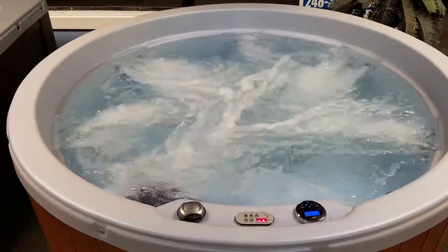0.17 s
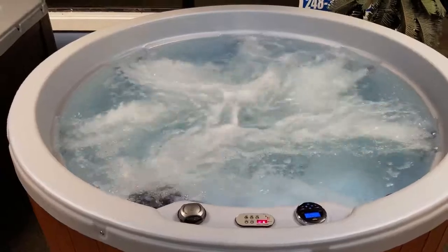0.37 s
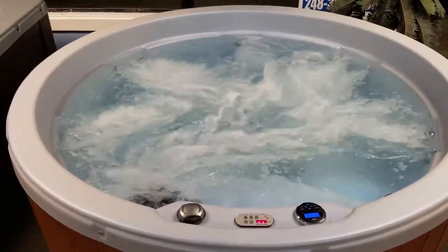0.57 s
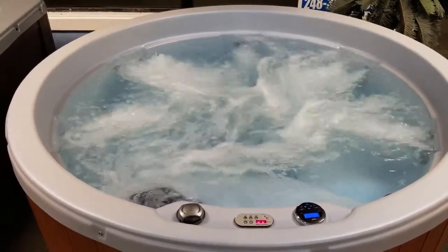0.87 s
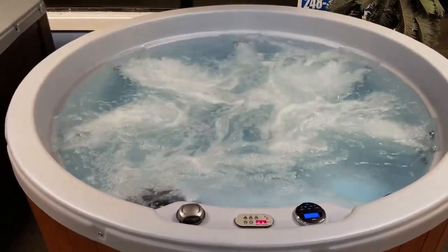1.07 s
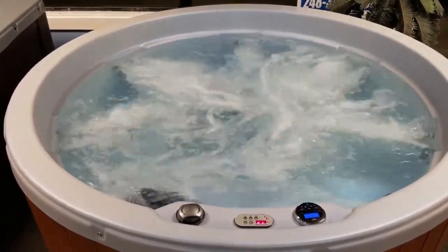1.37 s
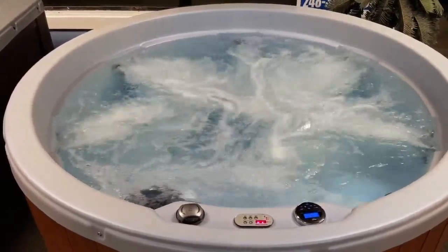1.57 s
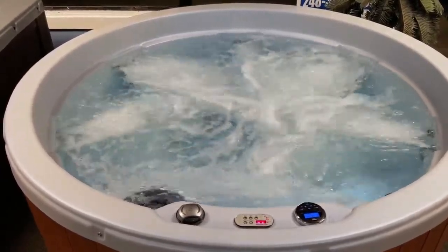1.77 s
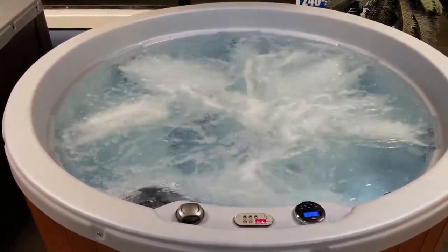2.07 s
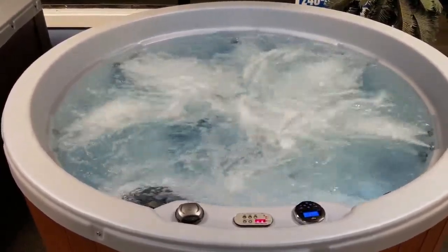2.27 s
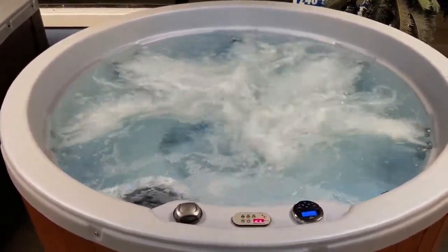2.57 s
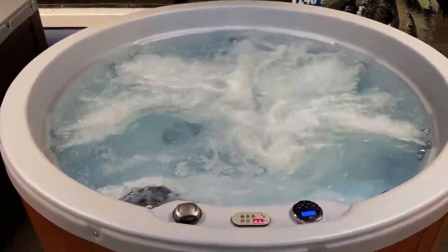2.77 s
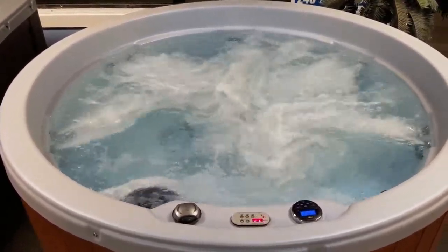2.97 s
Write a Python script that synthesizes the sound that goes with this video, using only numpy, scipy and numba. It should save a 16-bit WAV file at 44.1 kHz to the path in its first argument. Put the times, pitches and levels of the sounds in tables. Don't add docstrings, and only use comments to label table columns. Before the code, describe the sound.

A hot tub churns close to a small stereo camera microphone. After about 0.1 s of near silence it fades in quickly, then runs steadily to the end. Low, resonant jet roar dominates, with dense gurgling and deep glugs every few tenths of a second. Foam and air valves hiss brightly over a steady low pump hum. Light plops scatter throughout, clustering around 2.45-2.65 s; more glugs bunch near 3 s.

```python
import sys
import numpy as np
from scipy import signal
from scipy.fft import rfft, irfft
from scipy.io import wavfile
from scipy.ndimage import uniform_filter1d
from numba import njit

SR = 44100
rng = np.random.default_rng(int(sys.argv[2]) if len(sys.argv) > 2 else 0)


def inscribe(sig):
    pcm = np.round(np.clip(np.atleast_2d(sig).T, -1, 1) * 32767)
    wavfile.write(sys.argv[1], SR, pcm.astype(np.int16))


def field_ratio(decibels):
    return 10 ** (np.asarray(decibels, dtype=float) / 20)


N = 138033
HZ = np.arange(N // 2 + 1) * SR / N
PLOP_GLIDE = 0.2


def at_level(x, db):
    return x * field_ratio(db) / np.sqrt(np.mean(x ** 2))


def noise(channels):
    return rfft(rng.standard_normal((channels, N)))


def colour(curve):
    hz, db = np.array(curve, float).T
    log_hz = np.log(np.maximum(HZ, 1))
    below = np.maximum(np.log(hz[0]) - log_hz, 0)
    above = np.maximum(log_hz - np.log(hz[-1]), 0)
    return field_ratio(np.interp(log_hz, np.log(hz), db) - 146 * (below + above))


def bumps(bells):
    return field_ratio(sum(db * np.exp(-((HZ - hz) / width) ** 2) for hz, width, db in bells))


def surge(curve):
    return field_ratio(np.interp(np.arange(N) / SR, *np.array(curve).T))


def walk(rate):
    hold = int(SR / rate)
    steps = np.repeat(rng.standard_normal(200), hold)[:N + hold]
    return 1.5 * uniform_filter1d(uniform_filter1d(steps, hold), hold)[:N]


def lively(spectra, swell_db, flicker_db, rate):
    out, shared = 0, walk(1.5)
    octaves = np.log2(np.maximum(HZ, 1))
    for centre_hz in 40 * 2 ** np.arange(0, 9.1, .5):
        band = np.cos(np.pi * np.clip(octaves - np.log2(centre_hz), -.5, .5)) ** 2
        shared = .7 * shared + .7 * walk(3)
        out = out + irfft(spectra * band, N) * field_ratio(swell_db * shared + flicker_db * walk(rate))
    return out


@njit
def ring(bubble_rows, glide):
    out = np.zeros((2, N))
    for s, hz, cycles, left, right in bubble_rows:
        n = int(cycles * SR / hz)
        w = 2 * np.pi * hz / SR
        fall = np.exp(-3. / n)
        step = fall * np.exp(1j * w)
        bend = np.exp(1j * w * glide / n)
        z, shut = 1.8 + 0j, 1.
        start = int(s * SR)
        for i in range(start, min(start + 2 * n, N)):
            shut *= fall * fall
            out[0, i] += left * (1 - shut) * z.imag
            out[1, i] += right * (1 - shut) * z.imag
            z *= step
            step *= bend
    return out


def rows(s, hz, cycles, db, pan_db):
    return np.column_stack([s, hz, cycles + 0 * s, field_ratio(db + pan_db / 2), field_ratio(db - pan_db / 2)])


def rumble():
    return at_level(irfft(noise(channels=1)[0] / (1 + (HZ / 42) ** 6), N), -77)


def pump():
    # pitch in Hz, width in Hz, rms level in dB
    whine = [
        (1133, 51, -56),
        (1320, 4.3, -63),
        (2071, 63, -54.5),
    ]
    hum_hz, hum_db = 120.25, -41.5
    hum_gain = np.sqrt(2) * field_ratio(hum_db + 0.9 * walk(3.6))
    out = hum_gain * np.sin(2 * np.pi * hum_hz * np.arange(N) / SR)
    air = noise(channels=2)
    air = air + .5 * air[::-1]
    for hz, width, db in whine:
        out = out + at_level(irfft(air / (1 + (2 * (HZ - hz) / width) ** 2), N), db)
    return out


def foam():
    # frequency in Hz, density in dB per Hz
    spray = [(500, -7.5), (1000, -8.5), (1800, -5), (2080, -4.5), (2600, -7.5), (4500, -9.5), (9000, -12),
             (17500, -32)]
    # time in seconds, gain in dB
    water = [(.1, -1), (.48, -1.5), (.7, 0.5), (1.0, 1.5), (1.35, -1.5), (1.45, 2.5), (1.6, -1), (2.0, -1),
             (2.4, -1), (2.5, -0.5), (2.63, 0.5), (2.75, 1), (3.1, 2)]
    left, other = noise(channels=2) * colour(spray)
    alike = 0.99 * np.clip((1250 - HZ) / 400, 0, 1)
    both = np.array([left, alike * left + np.sqrt(1 - alike ** 2) * other])
    hiss = lively(both, swell_db=-1.0, flicker_db=0.5, rate=14)
    return at_level(hiss, -40.5) * surge(water)


def valve(hiss, paths, scatter, pan_db, db):
    paths = np.array(paths, float)
    ms, gain = paths[:, 0::2, None], paths[:, 1::2, None]
    echoes = (gain * np.exp(-2j * np.pi * HZ * ms / 1000)).sum(axis=0)
    lost = np.clip((HZ - 13700) / 300, 0, 1)
    diffuse = np.sqrt(np.array(scatter)[:, None] ** 2 + lost * (gain ** 2).sum(axis=0))
    both = noise(channels=1) * echoes * np.sqrt(1 - lost) + diffuse * noise(channels=2)
    pan = field_ratio(np.array([[.5], [-.5]]) * pan_db)
    return at_level(irfft(colour(hiss) * both * pan, N), db) * field_ratio(0.39 * walk(9.22))


def low_valve():
    # frequency in Hz, level in dB
    hiss = [(3000, -27), (3500, -4.5), (5000, 2.5), (6000, 5.5), (6500, 5), (6680, -33)]
    # left delay in ms, left gain, right delay in ms, right gain
    paths = [(0.0, 0.09, 0.942, 0.12), (1.232, -0.19, 1.619, 0.25), (1.723, -0.22, 2.465, 0.31),
             (2.203, 0.19, 3.873, -0.18), (3.757, -0.2, 4.112, 0.33), (4.88, 0.25, 5.218, -0.14),
             (5.972, -0.17, 5.572, 0.16), (7.262, 0.09, 7.076, -0.09)]
    scatter = (.05, .25)
    # frequency in Hz, pan in dB
    lean = [(5000, 0), (6000, -7)]
    return valve(hiss, paths, scatter, pan_db=np.interp(HZ, *np.array(lean).T), db=-45.5)


def middle_valve():
    # frequency in Hz, level in dB
    hiss = [(6500, -15), (6650, 0), (7300, 0), (8000, 2), (8300, -3.5), (9250, -4.5), (9450, -18)]
    # left delay in ms, left gain, right delay in ms, right gain
    paths = [(0.79, -0.26, 0.0, 0.36), (1.051, 0.62, 0.065, 0.3), (1.279, -0.21, 1.135, 0.5),
             (1.693, 0.21, 1.324, 0.6), (1.937, -0.14, 1.392, 0.45), (2.335, 0.16, 3.049, -0.3),
             (4.385, 0.24, 3.235, -0.54), (5.401, 0.13, 3.486, 0.41), (5.96, 0.18, 3.667, 0.23),
             (6.371, -0.13, 5.065, 0.64)]
    scatter = (.05, .3)
    return valve(hiss, paths, scatter, pan_db=-5, db=-42.5)


def high_valve():
    # frequency in Hz, level in dB
    hiss = [(10100, -7), (11200, -1.5), (11650, 2), (13300, -0.5), (13600, -8), (14400, -9), (15100, -2.5),
            (17500, -17)]
    # left delay in ms, left gain, right delay in ms, right gain
    paths = [(0, 1, .158, .52), (.733, -.62, .297, .3), (2.392, -.57, 2.295, -.26),
             (3.974, .48, 4.129, .36), (4.835, .38, 5.697, -.17)]
    scatter = (.75, .45)
    return valve(hiss, paths, scatter, pan_db=0.5, db=-43.5)


def rush():
    # frequency in Hz, density in dB per Hz
    roar = [(50, -11.5), (75, -19.5), (150, -8.5), (270, -0.5), (480, -7.5), (750, -15.5), (1500, -26),
            (3000, -28)]
    # frequency in Hz, width in Hz, lift in dB
    shell = [(91.5, 16, 3.5), (196, 25, -0.5), (240, 29, -0.5), (284, 16, 4), (306, 27, -2.5),
             (360, 16, 0.5), (435, 4.4, 2), (504, 55, 0.5), (640, 70, -4), (720, 3.7, 0.5)]
    # time in seconds, gain in dB
    churn = [(.1, -0.5), (.45, -0.5), (.75, -0.5), (1.1, -1), (1.4, 1), (1.65, 0), (1.9, -.5), (2.2, 0),
             (2.45, -1), (2.8, -0.5), (3.0, -2.5), (3.13, 0.5)]
    mid, side = noise(channels=2) * colour(roar) * bumps(shell)
    wide = 0.08 + np.clip(HZ / 1300, 0, 1) ** 2
    both = mid + wide * side * np.array([[1], [-1]])
    return at_level(lively(both, swell_db=0.95, flicker_db=0.5, rate=7), -32) * surge(churn)


def bubbles():
    # lowest Hz, highest Hz, cycles, size scatter in dB, level in dB, pan spread in dB
    crowds = [
        (178.5, 659, 6.6, 0.5, -39.5, 2.5),
        (752, 2580, 5.9, 2.5, -48.5, 18),
        (2470, 9800, 5.8, 8, -55.5, 7),
    ]
    per_second = [250, 500, 1500]
    out = 0
    for (lo, hi, cycles, scatter_db, db, pan_db), rate in zip(crowds, per_second):
        when, pitch, size, place, length = rng.random((int(rate * N / SR), 5)).T
        hz = lo * (hi / lo) ** pitch
        size_db = scatter_db * np.minimum(-np.log(1 - size), 2.5)
        crowd = rows(when * N / SR, hz, cycles * (.5 + length), size_db, pan_db * (2 * place - 1))
        out = out + at_level(ring(crowd, 0.21), db)
    return out


def plops():
    # start in seconds, level in dB, pitch in Hz, cycles, pan in dB
    clear = [(.397, -31, 13500, 7, 6), (.470, -31, 930, 9, .5), (.568, -33, 800, 7, -1.5),
             (.673, -33, 720, 7, -2), (.695, -33, 1250, 8, -1), (.84, -35, 1650, 10, 0),
             (1.158, -35, 1050, 7, -2), (1.208, -35, 1130, 7, -1.5), (1.33, -33, 730, 7, -1.5),
             (1.437, -33, 1500, 6, -1.5), (1.837, -34, 880, 7, -1), (2.454, -34, 1850, 10, -2.5),
             (2.468, -33, 1250, 9, -3), (2.479, -34, 2000, 14, 0), (2.492, -31, 1780, 11, -7),
             (2.536, -31, 1230, 11, 1), (2.554, -32, 1120, 10, -3), (2.565, -32, 2020, 10, 4),
             (2.582, -33, 1920, 12, -5), (2.584, -33, 880, 7, 0), (2.61, -34, 1900, 9, 0),
             (2.621, -24.5, 980, 6, .5), (2.596, -32, 1000, 8, 0), (2.648, -32, 950, 8, 0),
             (2.52, -33, 1950, 10, 2), (2.6245, -31, 1400, 7, -1), (2.993, -35, 1100, 7, -1)]
    s, db, hz, cycles, pan_db = np.array(clear, float).T
    return ring(rows(s, hz, cycles, db, pan_db), PLOP_GLIDE)


def glugs():
    # start in seconds, level in dB (5 dB is taken off below), pitch in Hz
    pockets = [(0.275, -19.5, 326), (0.609, -25, 277), (0.906, -18, 330), (1.035, -17.5, 225),
               (1.15, -27, 277), (1.21, -19.5, 268), (1.262, -19, 222), (1.55, -22, 284), (1.633, -19, 224),
               (1.897, -24.5, 219), (1.984, -21.5, 240), (2.061, -24, 293), (2.193, -18, 218),
               (2.41, -45, 280), (2.48, -26, 296), (2.697, -24, 280), (2.831, -28, 297), (2.97, -23, 270),
               (2.995, -20, 277), (3.041, -21, 266), (3.084, -25, 356)]
    s, db, hz = np.array(pockets, float).T
    return ring(rows(s, hz, 9.2, db - 5, 0 * s), PLOP_GLIDE)


def scene():
    valves = low_valve() + middle_valve() + high_valve()
    return pump() + foam() + valves + rush() + bubbles() + plops() + glugs()


def band_limit(x):
    return signal.sosfilt(signal.butter(12, 17070, fs=SR, output="sos"), x)


def record(dry):
    # frequency in Hz, width in Hz, lift in dB
    housing = [(50, 6, -2), (165, 22, -3), (2983, 30, 2.5), (3600, 50, 2), (5200, 170, -3), (6200, 50, 2),
               (8280, 60, -3), (9470, 80, -1), (9700, 130, 1), (9950, 90, -1), (13800, 550, 4),
               (14850, 150, -2)]
    # frequency in Hz, width in Hz, lift in dB
    right_port = [(1860, 510, 2), (14900, 530, 13.5), (10700, 660, -2.5), (13900, 500, 5.5),
                  (15720, 150, 8)]
    t = np.maximum(np.arange(N) / SR - .092, 0)
    fade = np.minimum(t / .003, 1) * (1 - .9 * np.exp(-t / .13))
    bass = (HZ / 51) ** 7
    edges = bass / (1 + bass) * np.clip((15770 - HZ) / 80 + .5, 0, 1)
    left, right = rfft(dry * fade) * edges * bumps(housing)
    right = right * bumps(right_port)
    low = rfft(rumble() * fade)
    left, right = left + low, right + low
    dip = np.exp(-((HZ - 9810) / 370) ** 4)
    mid = (left + right) / 2 * field_ratio(-7 * dip)
    side = (left - right) / 2 * field_ratio(-3 * dip)
    opened = np.minimum(t / .001, 1)
    mix = irfft(np.array([mid + side, mid - side]), N) * opened
    return band_limit(mix)


dry = scene()
out = record(dry)
inscribe(out)
```